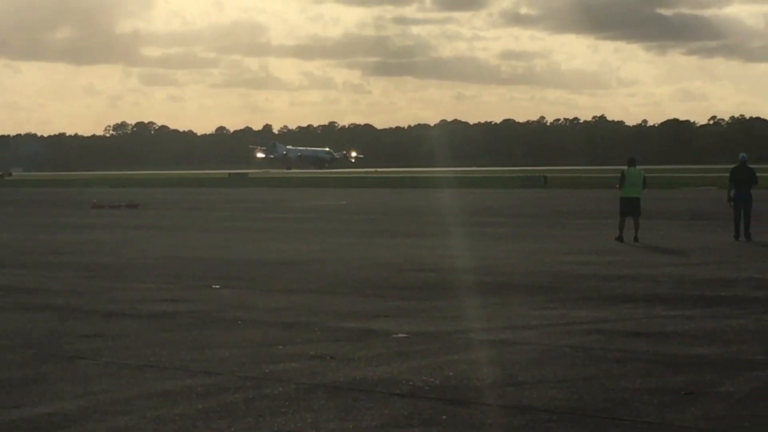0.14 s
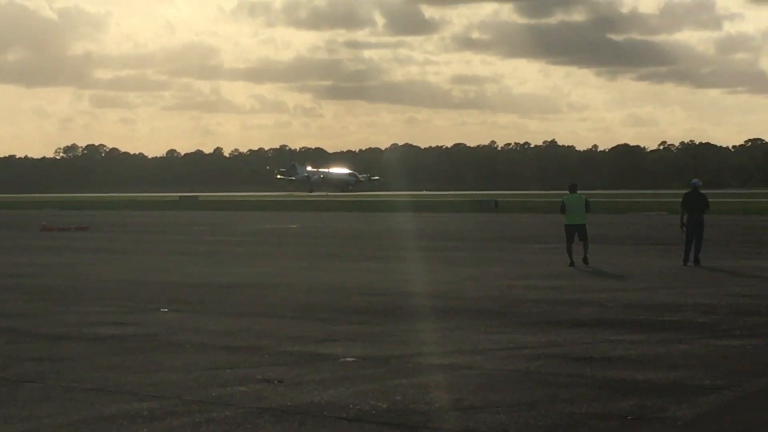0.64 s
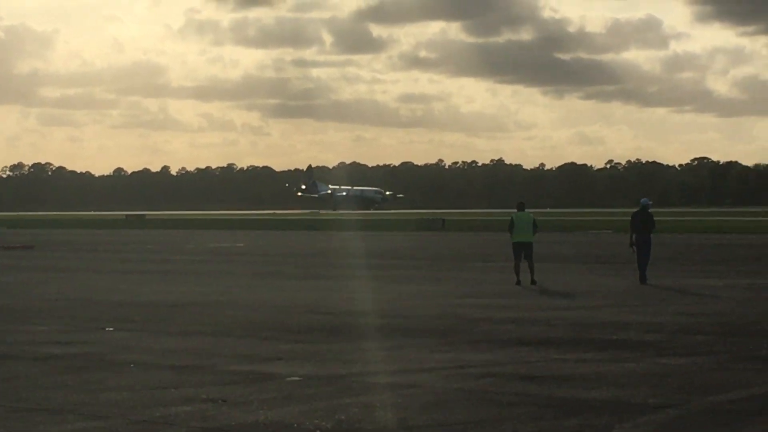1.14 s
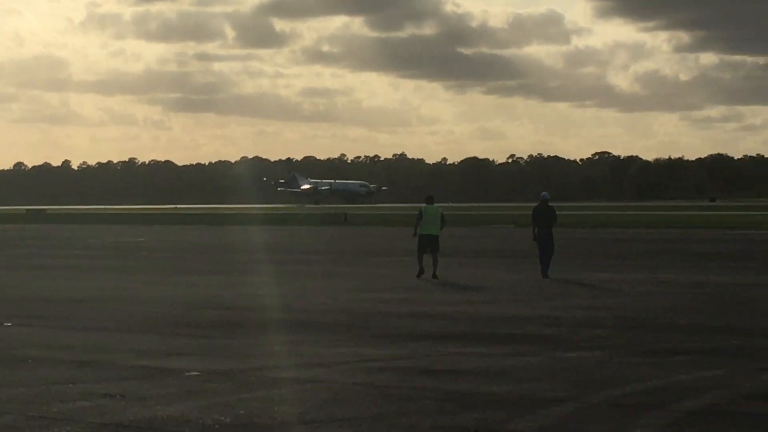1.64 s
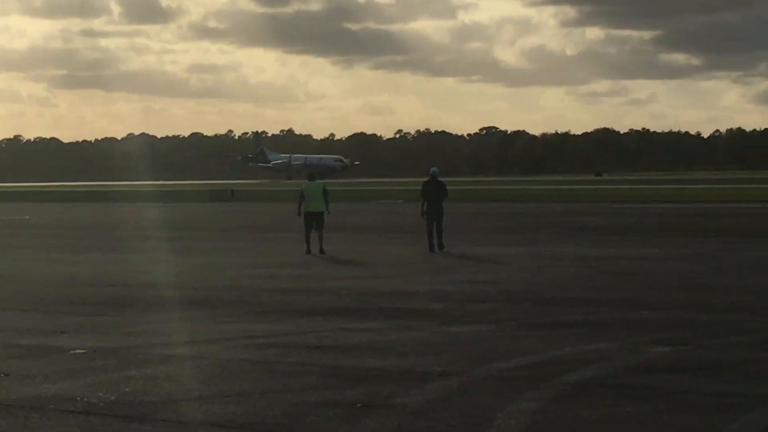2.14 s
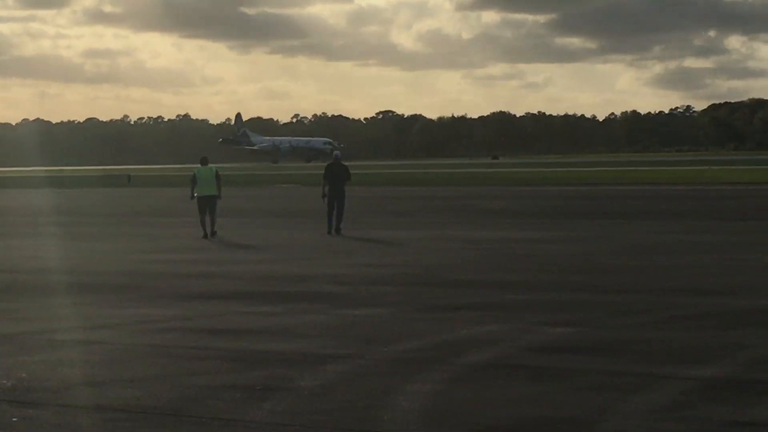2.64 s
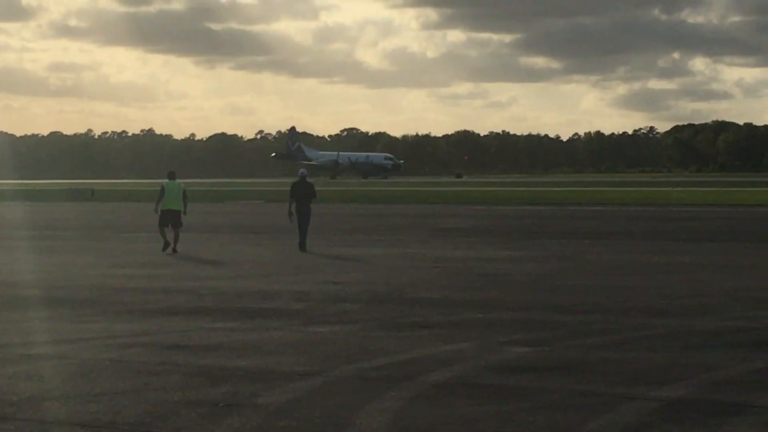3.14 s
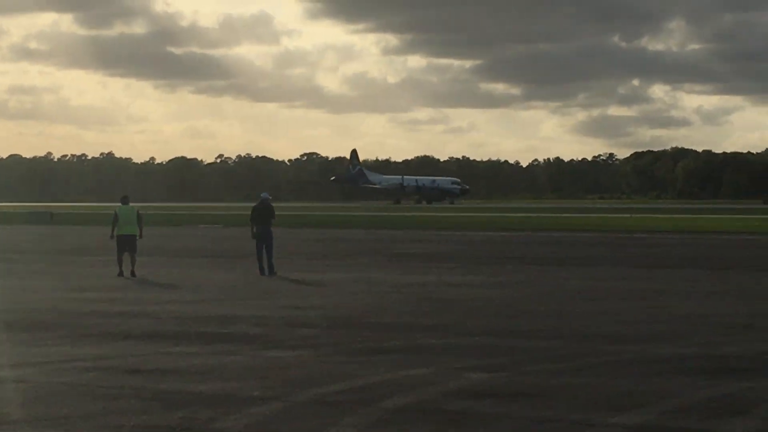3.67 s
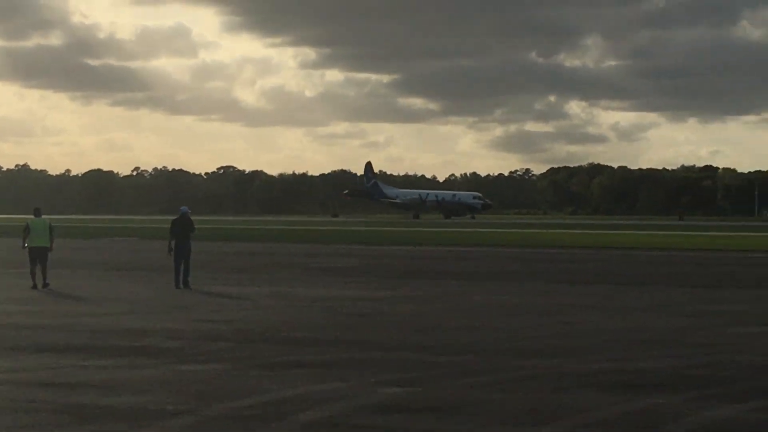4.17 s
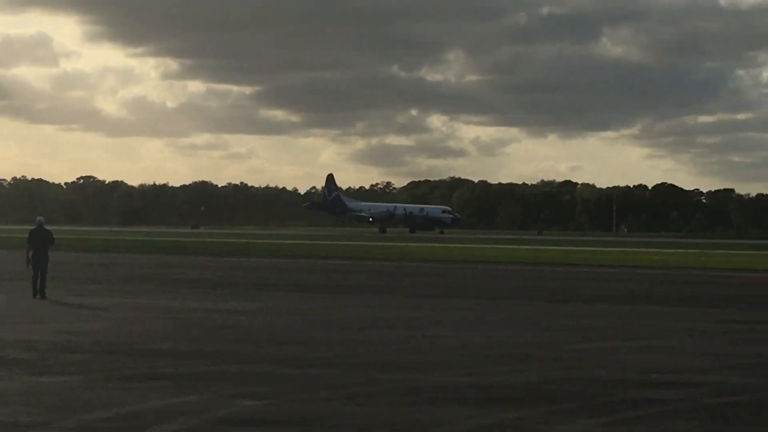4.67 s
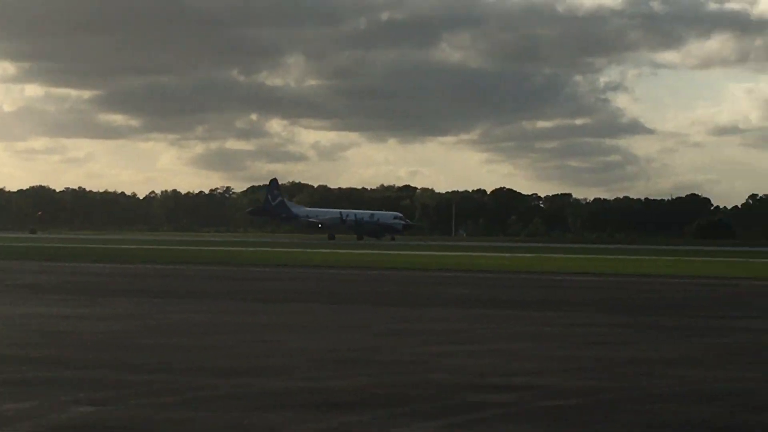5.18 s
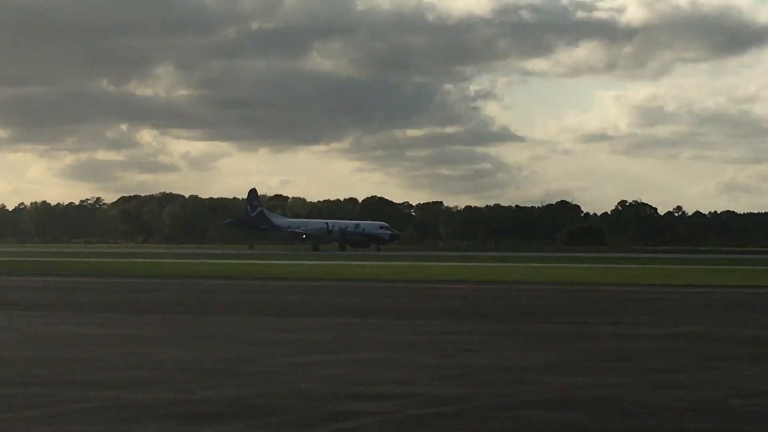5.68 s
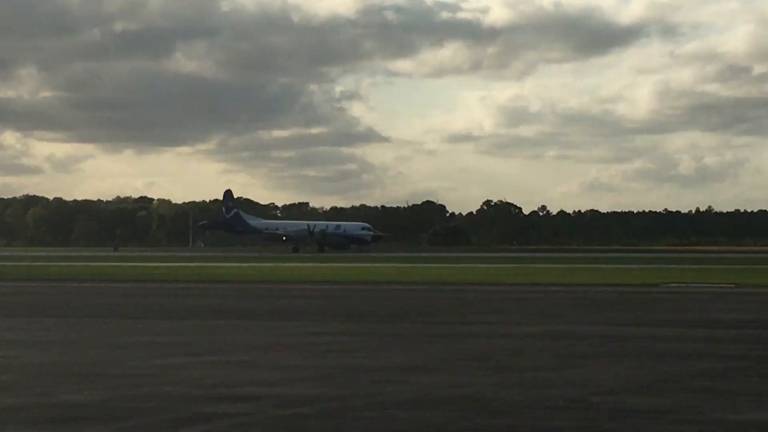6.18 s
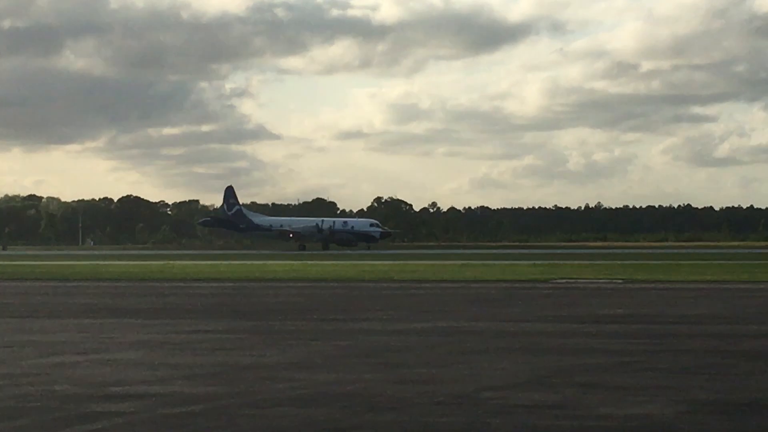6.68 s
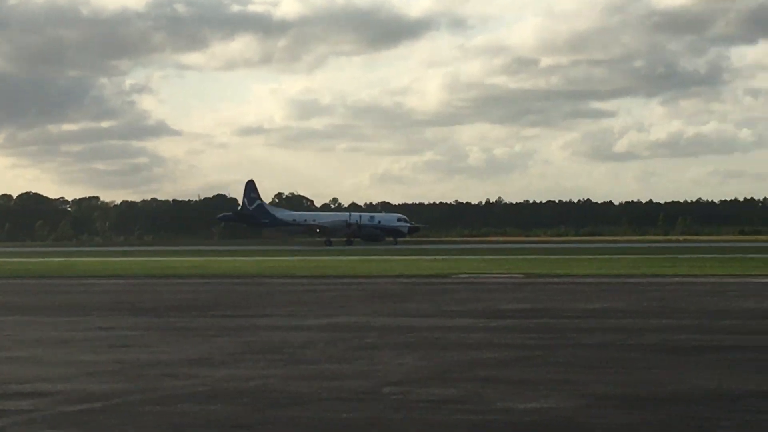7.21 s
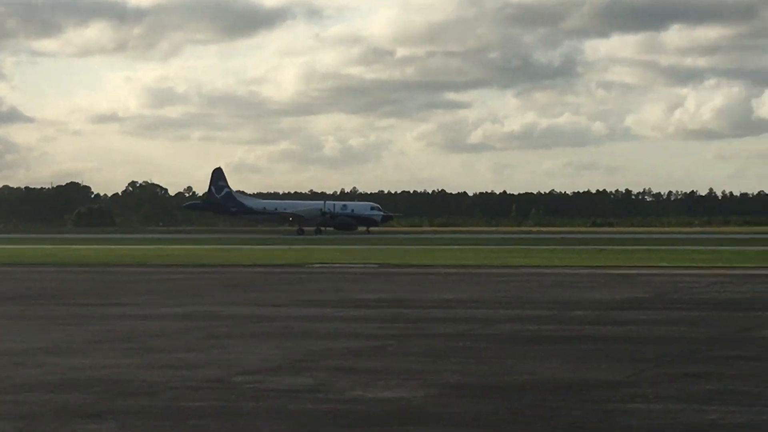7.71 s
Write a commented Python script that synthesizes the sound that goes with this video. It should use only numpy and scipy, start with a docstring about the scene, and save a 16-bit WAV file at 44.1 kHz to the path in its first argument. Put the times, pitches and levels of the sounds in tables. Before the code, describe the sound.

Faint machine hum, then a far-off turboprop's low beating propeller drone sets in, slides downward, and surges with rough churned air before easing.

```python
"""A distant runway across open ground: a machine nearby hums and whistles faintly on steady sines and noise.
Just before one second a four-engine turboprop's propellers bite into reverse: the blade tone and its octave,
each two beating sines, set in, throb and sink from about 81 to 69 Hz. Bands of noise for churned air, wind and
ground rumble rise with them in surges; the roar is strongest past six seconds, then eases.
The microphone rings around 3.6 kHz, dulls everything above and adds a faint hiss."""
import sys
import numpy as np
from scipy import signal
from scipy.fft import rfft, irfft, next_fast_len
from scipy.io import wavfile

SR = 44100
rng = np.random.default_rng(int(sys.argv[2]) if len(sys.argv) > 2 else 0)


def put_to_file(sound):
    """Save the sound as 16-bit audio at rate SR, in the file named by the first command-line argument."""
    columns = np.atleast_2d(sound).T  # one column per channel
    safe = np.clip(columns, -1, 1)
    whole_steps = np.round(safe * 32767)
    wavfile.write(sys.argv[1], SR, whole_steps.astype(np.int16))


def level_to_linear(level):
    """Convert decibel levels to linear amplitude factors, elementwise."""
    exponent = np.asarray(level, float) / 20
    return 10 ** exponent


N = 345150  # length in samples


def rms_one(x):
    """Scales a signal to rms 1."""
    return x / np.sqrt(np.mean(x ** 2) + 1e-20)


def in_time(rows):
    """Draws each column after the first as a line through its values at the seconds in the first."""
    seconds, *columns = np.transpose(rows)
    return [np.interp(np.arange(N) / SR, seconds, column) for column in columns]


def drift(rate_hz):
    """Slow chance of spread 1: noise at every 40th sample through a double one-pole low-pass."""
    pole = np.exp(-2 * np.pi * rate_hz * 40 / SR)
    steps = rng.standard_normal(N // 40 + 2002)
    slow = signal.lfilter([1], [1, -2 * pole, pole ** 2], steps)[2000:]  # skip the filter's start
    return np.interp(np.arange(N) / 40, np.arange(len(slow)), rms_one(slow))


def coloured(spectrum):
    """Noise of rms 1 with the given spectrum (Hz, dB), silent outside it."""
    size = next_fast_len(N)
    hz, level_db = np.transpose(spectrum)
    log_bins = np.log(np.arange(size // 2 + 1) * SR / size + 1)  # + 1 avoids the log of zero
    shape = level_to_linear(np.interp(log_bins, np.log(hz), level_db, left=-200, right=-200))
    white = rfft(rng.standard_normal(size))
    return rms_one(irfft(white * shape, size)[:N])


def tilted(x, hz, tilt_db):
    """What lies above hz is lifted and what lies below is lowered by half the tilt each."""
    low = signal.sosfiltfilt(signal.butter(2, hz, fs=SR, output="sos"), x)
    high = x - low
    return level_to_linear(-tilt_db / 2) * low + level_to_linear(tilt_db / 2) * high


def blade_phase():
    """The blade rate summed up to a phase, unsteady after the long way through moving air."""
    # Blade passing rate as heard. Each row: time in seconds, rate in Hz.
    blade_rate = [(0, 80), (1.0, 80.3), (1.4, 81.1), (2.1, 81.1), (2.6, 80.6), (3.0, 78.3), (3.9, 75.2),
                  (4.4, 73.8), (4.9, 73.4), (5.3, 72), (5.7, 71.95), (6.0, 70.8), (7.2, 70.4), (7.83, 69.3)]
    hz, = in_time(blade_rate)
    unsteady_hz = hz + 0.35 * drift(5.0)
    return 2 * np.pi * np.cumsum(unsteady_hz) / SR


def beating(phase, beats):
    """Two sines drift half a turn apart from dip to crest and crest to dip; their weighted mean keeps the phase."""
    t = np.arange(N) / SR
    dip_s, balance_db, crest_s, crest_db = np.transpose(beats)
    # odd half turns apart at the dips, whole turns at the crests
    half_turns = np.pi * np.arange(1, 2 * len(dip_s) + 1)
    apart = np.interp(t, np.sort(np.r_[dip_s, crest_s]), half_turns)
    share = 1 / (1 + level_to_linear(-np.interp(t, dip_s, balance_db)))  # the faster sine's part of the amplitude
    slower = phase - np.cumsum(share * np.gradient(apart))
    pair = share * np.sin(slower + apart) + (1 - share) * np.sin(slower)
    return level_to_linear(np.interp(t, crest_s, crest_db)) * pair


def propellers(phase):
    """Blade tone and its rougher octave from beating pairs; both set in as the blades take load."""
    # A faster and a slower pair of propellers beat. Each row: opposed at seconds,
    # faster minus slower in dB, next crest at seconds, crest level under load in dB rms.
    tone_beats = [(0.0, 21, 0.15, -24), (0.4, 1.5, 0.62, -29), (0.87, 8, 1.08, -27),
                  (1.2, 11.5, 1.48, -18.5), (1.73, 17.5, 1.82, -22.5), (1.93, 4.5, 2.29, -18.5),
                  (2.62, 9.5, 2.774, -13.5), (2.92, -1, 3.06, -18), (3.28, 5, 3.41, -13),
                  (3.55, 5.5, 3.66, -16.5), (3.848, -3.5, 3.97, -17), (4.1, -4, 4.16, -21),
                  (4.21, -10, 4.28, -14.5), (4.49, -0.5, 4.675, -11.5), (4.85, 9, 4.99, -12),
                  (5.2, -12, 5.32, -15.5), (5.55, -16, 5.66, -15), (5.79, -21, 5.88, -15),
                  (6.04, -10, 6.19, -18), (6.24, -16, 6.36, -15.5), (6.55, -12, 6.62, -19.5),
                  (6.76, -10, 6.82, -21), (6.99, -2, 7.08, -26), (7.24, 9.5, 7.41, -13),
                  (7.51, 14, 7.56, -19), (7.62, 1.5, 7.66, -23), (7.74, -3, 7.86, -27)]
    # The octave beats at moments of its own. Each row: opposed at seconds,
    # faster minus slower in dB, next crest at seconds, crest level under load in dB rms.
    octave_beats = [(0.0, 7, 0.5, -46), (0.95, 8.5, 1.08, -42), (1.3, 8, 1.43, -47),
                    (1.58, 2.5, 1.8, -38.5), (2.15, -2.5, 2.47, -41), (2.6, -5.5, 2.77, -40.5),
                    (2.95, -2.5, 3.047, -36), (3.17, 8, 3.36, -28), (3.48, 6.5, 3.55, -31.5),
                    (3.72, 9, 3.89, -31.5), (4.03, 1.5, 4.26, -32), (4.45, 9.5, 4.6, -29.5),
                    (4.69, -0.5, 4.83, -28), (5.05, 4, 5.14, -24.5), (5.25, 4, 5.32, -29),
                    (5.45, 0, 5.58, -30), (5.68, 5.5, 5.78, -26.5), (5.9, 3.5, 5.99, -23),
                    (6.06, 2, 6.17, -29), (6.47, 2.5, 6.51, -30), (6.58, 5.5, 6.67, -25),
                    (6.76, 5.5, 6.91, -24.5), (6.98, 8, 7.05, -19), (7.14, -2, 7.21, -24.5),
                    (7.32, 12, 7.58, -25), (7.65, 2.5, 7.856, -17.5)]
    bite_s, rise_s = 0.9, 0.055  # middle and time constant of the onset
    idle_tone_db, idle_octave_db = -20.5, -23  # how far both lie down before the bite
    idle = 1 / (1 + np.exp((np.arange(N) / SR - bite_s) / rise_s))
    tone_gain = level_to_linear(idle_tone_db * idle + 0.43 * drift(14.0))
    tone = tone_gain * beating(phase, tone_beats)
    octave_gain = level_to_linear(idle_octave_db * idle + 2.1 * drift(18.0))
    octave_phase = 2 * phase + 0.58 * drift(5.9)
    octave = octave_gain * beating(octave_phase, octave_beats)
    return np.sqrt(2) * (tone + octave)  # from rms to peak


def churned_air(phase):
    """Four noise layers flicker, three of them also together; the colours of roar and hiss shift restlessly."""
    # Churned air. Each row: time in seconds, roar in dB, rush in dB, hiss in dB.
    air = [(0.0, -56.5, -54, -52), (0.9, -55.5, -55, -51), (1.1, -48.5, -46.5, -44), (1.65, -47, -47, -43),
           (2.1, -45.5, -44.5, -41.5), (2.76, -42, -43, -40.5), (3.67, -40.5, -42, -41.5),
           (4.21, -37, -36.5, -36), (4.32, -37, -40.5, -40), (4.64, -30.5, -37.5, -38.5),
           (4.92, -26.5, -33.5, -38.5), (5.29, -30.5, -37, -39), (5.44, -32.5, -33, -39),
           (5.6, -32.5, -37, -39), (5.76, -31.5, -34, -38), (5.9, -29, -36.5, -39),
           (6.12, -26.5, -30.5, -35.5), (6.22, -22, -38, -36), (6.41, -31.5, -39, -40),
           (6.9, -37, -41.5, -40.5), (7.83, -36.5, -41.5, -39.5)]
    # Rumble level and colour shifts of roar and hiss, quick and uneven. Each row: time in seconds,
    # rumble level in dB, roar tilt in dB, hiss tilt in dB, lift of the very top in dB.
    colour_shifts = [(0, -54, -11, -0.5, 2), (0.85, -53.5, -5, 2, -1), (1.2, -49.5, -5, -2.5, -4),
                     (1.7, -47.5, -3, -3, -1), (2.1, -44, 1, -1.5, -3), (2.45, -40, -3, 0.5, -3.5),
                     (2.75, -42.5, -3.5, -2.5, 2), (3.3, -38, 3, -1, 0.1), (3.7, -40, 8, 1.5, -1.5),
                     (4.4, -38.5, 11, -1.5, 0.5), (4.7, -30.5, -1.5, 0, 0.1), (5.4, -35, -3.5, 0.5, 1),
                     (5.85, -34, 3, 0.5, 2), (6.0, -28.5, -1.5, 1, 3), (6.24, -33, -5.5, 1, 3.5),
                     (6.42, -28.5, 0.1, 1, 1.5), (7.0, -33.5, -0.2, 1.5, 1), (7.83, -29, -7, 0.5, 3.5)]
    # Colour of the low rumble. Each row: frequency in Hz, density in dB.
    rumble_colour = [(110, -30.5), (140, -6), (175, 0), (215, -3), (270, -13), (400, -42)]
    # Colour of the roar. Each row: frequency in Hz, density in dB.
    roar_colour = [(150, -33), (230, -1.5), (350, -1), (460, -1), (600, -10), (760, -23), (1000, -47)]
    # Colour of the rush above it. Each row: frequency in Hz, density in dB.
    rush_colour = [(400, -28.5), (600, -1), (750, -5.5), (1000, -2), (1400, -6), (2000, -14.5),
                   (3000, -36.5)]
    # Colour of the hiss. Each row: frequency in Hz, density in dB.
    hiss_colour = [(900, -29.5), (1400, -6.5), (1900, -4.5), (2500, -7), (2950, -9), (3200, -3.5),
                   (3700, -7), (5000, -13.5), (7000, -13.5), (8800, -11.5), (10500, -26.5), (14000, -40)]
    roar_db, rush_db, hiss_db = in_time(air)
    rumble_db, roar_tilt_db, hiss_tilt_db, top_db = in_time(colour_shifts)
    chop_db = 0.67  # the air noise pulses slightly with each blade
    shared_db = 0.26 * drift(3.3) + chop_db * np.sin(phase)

    rumble = level_to_linear(rumble_db + 0.63 * drift(4.0)) * coloured(rumble_colour)
    roar_noise = tilted(coloured(roar_colour), hz=420, tilt_db=roar_tilt_db)
    roar = level_to_linear(roar_db + 0.89 * drift(5.2) + shared_db) * roar_noise
    rush = level_to_linear(rush_db + 1.0 * drift(19.0) + shared_db) * coloured(rush_colour)
    hiss_noise = tilted(coloured(hiss_colour), hz=2400, tilt_db=hiss_tilt_db)
    hiss = level_to_linear(hiss_db + 0.34 * drift(14.0) + shared_db) * hiss_noise
    # the very top of the hiss brightens and dulls
    top = signal.sosfiltfilt(signal.butter(3, 5800, "high", fs=SR, output="sos"), hiss)
    return rumble + roar + rush + hiss + (level_to_linear(top_db) - 1) * top


def wind():
    """Lumpy wind noise at the bottom and a rumble of noise around the blade tone."""
    # Wind and ground rumble under the tone. Each row: time in seconds, wind in dB, rumble in dB.
    wind_levels = [(0.0, -53, -47), (0.89, -44, -46), (1.24, -40, -34.5), (1.45, -40, -49),
                   (1.72, -37, -32.5), (1.9, -39.5, -43), (2.42, -35, -29.5), (2.9, -45.5, -35.5),
                   (3.9, -43, -32.5), (4.38, -52.5, -29.5), (4.69, -35, -29), (4.8, -50, -28),
                   (5.14, -42, -30), (5.8, -41.5, -30), (6.19, -40.5, -25), (6.69, -44, -27),
                   (6.87, -33.5, -27), (7.83, -42, -31.5)]
    # Colour of the wind. Each row: frequency in Hz, density in dB.
    gust_colour = [(12, -40.5), (22, -14), (35, -4.5), (50, 1), (65, 0.5), (90, -10.5), (150, -41.5)]
    # Colour of the ground rumble. Each row: frequency in Hz, density in dB.
    ground_colour = [(40, -31), (55, -7.5), (75, -4.5), (95, 0.5), (125, -3.5), (150, -8), (200, -37)]
    wind_db, ground_db = in_time(wind_levels)
    gusts = level_to_linear(wind_db + 1.2 * drift(3.9)) * coloured(gust_colour)
    ground = level_to_linear(ground_db + 1.7 * drift(6.0)) * coloured(ground_colour)
    return gusts + ground


def hum():
    """Steady tones that waver slightly in phase, over a breathy noise whistle of the same machine."""
    # Steady machine tones at the microphone. Each row: frequency in Hz, level in dB rms.
    machine_tones = [(576.0, -64.5), (866.7, -72), (1157, -69.5), (1863, -67.5)]
    # Colour of the whistle. Each row: frequency in Hz, density in dB.
    whistle_colour = [(1200, -31), (1550, -5.5), (1850, -2), (1950, -10), (2300, -32.5)]
    whistle_db = -59
    t = np.arange(N) / SR
    tones = np.zeros(N)
    for hz, level_db in machine_tones:
        wavering_phase = 2 * np.pi * hz * t + 1.3 * drift(3.1)
        tones += np.sqrt(2) * level_to_linear(level_db) * np.sin(wavering_phase)
    return tones + level_to_linear(whistle_db) * coloured(whistle_colour)


def scene():
    """Aircraft, wind and machine as they arrive together at one microphone."""
    phase = blade_phase()
    mix = propellers(phase) + churned_air(phase) + wind() + hum()
    return mix[None]  # one channel


def low_pass(x):
    """Removes everything above the highest recorded frequency."""
    return signal.sosfilt(signal.butter(12, 15720, fs=SR, output="sos"), x)


def record(dry):
    """The port resonates near its peak and falls steeply above; a faint hiss of its own lies on top."""
    # Colour of the microphone's own hiss. Each row: frequency in Hz, density in dB.
    self_noise_colour = [(2000, -12), (5000, -1), (7500, -7), (8800, 1), (10500, -6.5), (11500, -5.5),
                         (16000, -8), (20000, -10.5)]
    peak_hz, peak_width_hz, peak_db = 3626, 462, 8.5  # peak_db: lift ahead of the fall
    cut_hz, self_noise_db = 4580, -83.5
    radius = np.exp(-np.pi * peak_width_hz / SR)
    turn = 2 * np.pi * peak_hz / SR
    zeros = np.array([1, 0, -1]) * (1 - radius ** 2) / 2
    poles = [1, -2 * radius * np.cos(turn), radius ** 2]
    resonance = signal.lfilter(zeros, poles, dry)
    peaked = dry + (level_to_linear(peak_db) - 1) * resonance
    dulled = signal.sosfilt(signal.butter(6, cut_hz, fs=SR, output="sos"), peaked)
    finished = dulled + level_to_linear(self_noise_db) * coloured(self_noise_colour)
    return low_pass(finished)


dry = scene()
out = record(dry)
put_to_file(out)
```